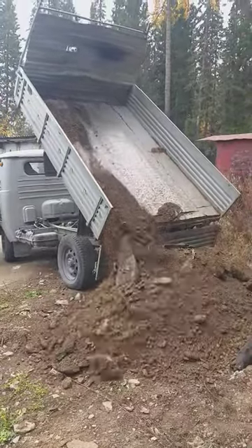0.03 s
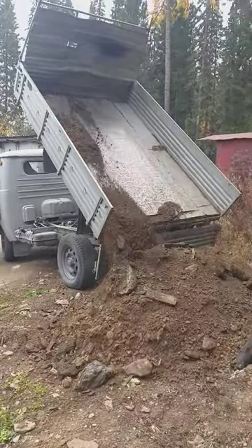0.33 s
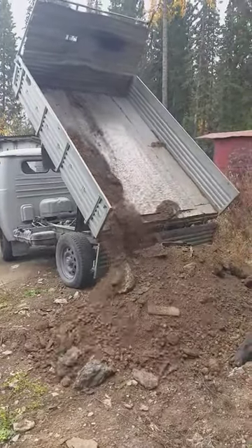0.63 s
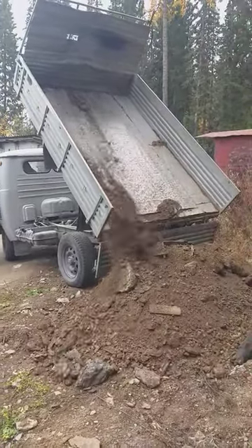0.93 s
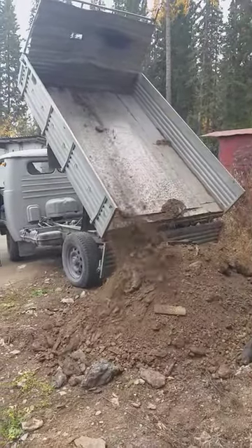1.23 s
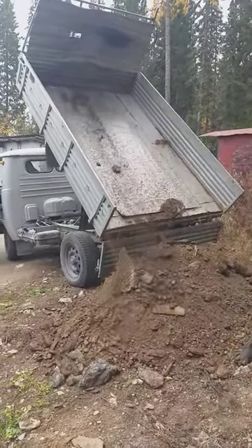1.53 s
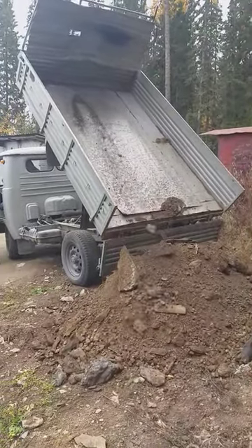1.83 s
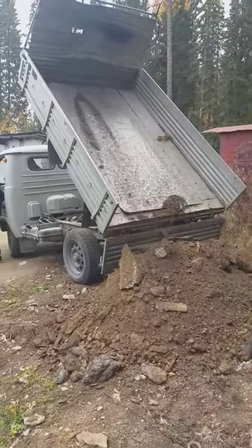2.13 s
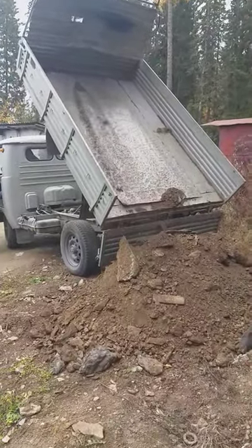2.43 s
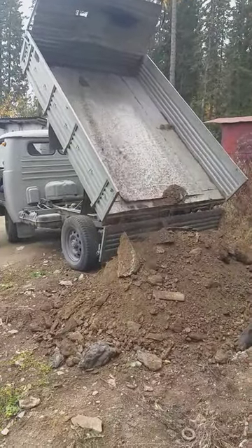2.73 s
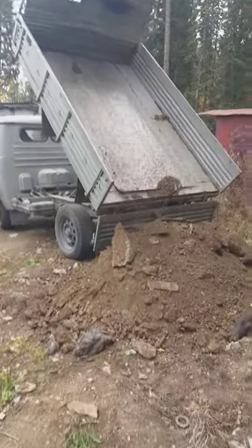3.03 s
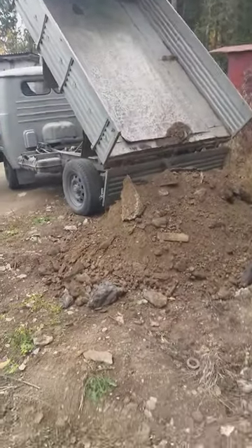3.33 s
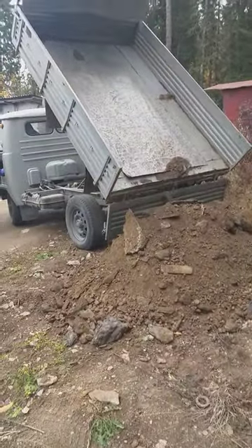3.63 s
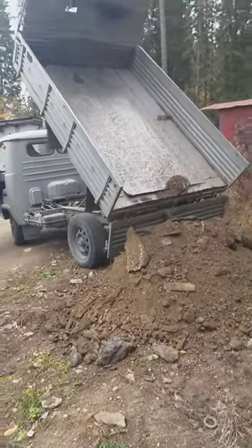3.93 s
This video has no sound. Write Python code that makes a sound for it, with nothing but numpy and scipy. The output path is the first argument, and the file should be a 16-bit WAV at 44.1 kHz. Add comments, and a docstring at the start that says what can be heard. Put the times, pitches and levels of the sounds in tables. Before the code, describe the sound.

Soil rushes down a tipper truck's steel bed for the first 1.4 seconds, with stones clacking, knocking and squealing in short gliding tones. Clods thud dully on the heap, most clearly near 1 second. From 1.5 seconds crumbs trickle and pebbles skip down the metal, thinning out after 3.2 seconds. A quiet engine drones throughout, and a faint thin whistle joins at about 3.5 seconds.

```python
"""Soil rushes down the raised steel bed of a small tipper truck, the last of its load, at a forest edge.
Stones in it clack and knock on the steel, and squeal in gliding tones as they stick and slip.
Clods thud on the heap, then crumbs trickle off the bed and thin out, leaving the engine's drone.
Near the end a thin whistle comes in, perhaps from the hydraulics."""
import sys
import numpy as np
from scipy import signal
from scipy.fft import rfft, irfft, next_fast_len
from scipy.io import wavfile
from scipy.ndimage import map_coordinates

SR = 44100
rng = np.random.default_rng(int(sys.argv[2]) if len(sys.argv) > 2 else 0)


def generate_wav(sig):
    """Save sig (samples, or channels by samples) to the path in sys.argv[1] as 16-bit PCM at SR."""
    pcm = np.round(np.clip(np.atleast_2d(sig).T, -1, 1) * 32767).astype(np.int16)
    wavfile.write(sys.argv[1], SR, pcm)


N = 176400

# tone colour of crumbs and pebbles on the bed, bright part and middle part (f/Hz, relative level/dB)
CRUMB_TREBLE = [(1700, -37), (2330, -14), (2650, 0), (3020, -5), (3450, 1), (3730, -6), (3990, 2.5),
                (4300, -0.5), (4580, 1), (5200, 1), (6150, -3), (7200, -.5), (8150, -.5), (10000, -19),
                (12800, -11), (15800, -13.5)]
CRUMB_MIDRANGE = [(260, -21.5), (450, -12.5), (600, -1), (760, -0.5), (930, -1), (1080, -15), (1310, -1.5),
                  (1670, -9), (2000, 3.5), (2350, -8.5), (3500, -33)]


def sliding_soil():
    """The mass of soil grinds over the bed: dense grit on top, ringing sheet steel below."""
    # loudness of the slide (t/s, grit level/dB, midrange level/dB)
    levels = [(0, -17.5, -25.5), (.07, -28.5, -29.5), (.125, -23, -28), (.17, -17, -28.5),
              (.28, -19.5, -25.5), (.5, -19, -27), (.7, -21, -25.5), (.78, -21, -23), (.84, -30.5, -30.5),
              (.91, -26, -39), (.96, -25, -32.5), (1.0, -20.5, -29.5), (1.13, -18.5, -30),
              (1.18, -22.5, -31), (1.31, -30.5, -31.5), (1.38, -32.5, -38.5), (1.44, -41, -51),
              (1.7, -83, -83)]
    # tone colours of the grit and of the bed's midrange (f/Hz, relative level/dB)
    grit_colour = [(1200, -31.5), (2400, -9), (3200, -6.5), (3600, -3), (4200, -4.5), (4600, -1.5),
                   (6400, -6), (8100, -5), (9000, -14.5), (10000, -29.5), (12000, -21), (15800, -36)]
    body_colour = [(200, -39.5), (480, -15.5), (620, 1.5), (800, 1.5), (1150, -1), (1700, 0), (2050, 1.5),
                   (2500, -8.5), (4000, -24.5)]
    grit_db, body_db = curves(levels)
    grit = unit(steel(shaped(grains(per_s=14000, spread_db=4.0), grit_colour), ring_db=5.0))
    body = unit(steel(shaped(grains(per_s=6000, spread_db=2), body_colour), ring_db=-0.5))
    return grit * amp(grit_db + 0.39 * wobble(42.3)) + body * amp(body_db + 1.15 * wobble(39.43))


def steel(x, ring_db):
    """The steel bed rings at its own pitches and adds them to the sound x."""
    # ringing pitches of the bed (f/Hz, width/Hz, relative level/dB)
    modes = [(767, 30, -4), (798, 40, -3), (1432, 15, 5.5), (1927, 28, 3.5), (2120, 59, 3.5),
             (2760, 240, -2.5), (3440, 20, -1), (3590, 50, 2.5), (3690, 37, -3), (4155, 92, 5.5),
             (4950, 45, 2.5), (5640, 240, -3.5), (6450, 77, -3), (6950, 44, -1), (7160, 65, -7.5),
             (7840, 150, -2)]
    def response(f):
        ring = sum(amp(db) * 1j * f * w / (hz * hz - f * f + 1j * f * w) for hz, w, db in modes)
        return (1 + amp(ring_db) * ring) / (1 + amp(ring_db) / 3)
    return filtered(x, response)


def clacking_stones():
    """Stones strike the steel: a ringing clack, with a sharp crack just after the first touch."""
    # strikes (t/s, clack level/dB, fade time/s, brightness/dB per octave, crack level/dB)
    strikes = [(0.0888, -8.5, 0.093, 2, -1), (0.4743, -7.5, 0.015, 8, -6), (0.684, -14.5, 0.25, 3.5, -4),
               (0.8896, -14, 0.035, 4.5, -5), (0.9123, -11, 0.1, -1, 2), (1.337, -18, 0.16, 4.5, 2.5)]
    # tone colours of the clack and the crack (f/Hz, relative level/dB)
    clack_colour = [(500, -35), (2800, -21), (3600, -9), (4200, 1.5), (5000, -4.5), (6000, -9), (7300, -4),
                    (8500, -14), (10000, -34.5), (12000, -23), (15800, -42)]
    crack_colour = [(2500, -31), (4300, 4), (5800, 1), (7400, 4), (10000, -17), (12200, -10), (15800, -17)]
    crack_lag_s = 0.00071
    clacks = sum(shaped(burst(s, db, t60, attack_s=0.00072), clack_colour, tilt_db)
                 for s, db, t60, tilt_db, _ in strikes)
    cracks = sum(tap(s + crack_lag_s, db) for s, *_, db in strikes)
    return steel(clacks, ring_db=-2) + shaped(cracks, crack_colour)


def knocking_stones():
    """Heavier stones hit the bed, scuff it and knock a short clank out of it."""
    # knocks (t/s, blow level/dB, scuff level/dB, scuff fade time/s)
    knocks = [(0.3888, -0.5, -14, 0.025), (0.7746, 7, -22, 0.071), (0.7760, 2, -22, 0.06),
              (0.7874, -5, -20, 0.045)]
    # tone colour of a knock (f/Hz, relative level/dB)
    knock_colour = [(100, -70), (500, -36), (950, -6.5), (1300, 6.5), (2000, 3), (2450, -4), (3300, -13),
                    (4200, -26), (5400, -13), (9000, -38), (15000, -51)]
    # tones of the clank (f/Hz, relative level/dB, fade time/s)
    clank_tones = [(1245, -27, .02), (1420, -28, .02), (1580, -32, .012), (1920, -26, .022),
                   (2100, -27, .012)]
    blows = sum(tap(s, db) for s, db, *_ in knocks)
    scuffs = sum(burst(s, db, t60, attack_s=0.001) for s, _, db, t60 in knocks)
    t = np.arange(SR // 8) / SR
    clank = sum(amp(db - 60 * t / t60) * np.cos(2 * np.pi * hz * t) for hz, db, t60 in clank_tones)
    return shaped(blows + scuffs, knock_colour) + signal.fftconvolve(blows, clank)[:N]


def scraping_stones():
    """Stones stick and slip on the steel at an unsteady rate, which makes a gliding squeal."""
    # one list per stone (t/s, slip rate/Hz, relative level/dB, unsteadiness/share of the rate)
    scrapes = [
        [(.135, 690, -22, 0.06), (.17, 847, -21.5, 0.04), (.22, 949, -30, 0.015), (.265, 1049, -21.5, 0.025),
         (.3, 1070, -39, .04)],
        [(.972, 690, -30, 0.048), (1.003, 836, -24.5, 0.025), (1.04, 917, -31.5, 0.025),
         (1.075, 999, -28, 0.018), (1.115, 1007, -22, 0.013), (1.14, 927, -26, 0.028), (1.2, 748, -42, .05)],
        [(1.06, 2100, -33, 0.036), (1.118, 1927, -28, 0.026), (1.142, 1820, -26.5, 0.04),
         (1.162, 1580, -29, .06), (1.185, 1390, -26.5, .06), (1.215, 1178, -28, .075), (1.255, 934, -28, 0.1)],
        [(1.22, 1610, -25, 0.12), (1.253, 1373, -28, 0.12), (1.275, 1186, -27, 0.11), (1.292, 1074, -40, .09),
         (1.312, 1018, -23.5, 0.025), (1.335, 970, -48, 0.062)],
    ]
    octave_db = -7.5
    t, out = np.arange(N) / SR, np.zeros(N)
    for rows in scrapes:
        hz, db, jitter = curves(rows)
        start, end = rows[0][0], rows[-1][0]
        fade = np.clip(np.minimum(t - start, end - t) / 0.004, 0, 1)
        turn = phase(hz * (1 + jitter * wobble(600)))
        squeal = np.sin(turn) + amp(octave_db) * np.sin(2 * turn)
        out += fade * amp(db - 1.0 + 2.4 * wobble(260)) * squeal
    return out


def singing_bed():
    """Now and then the rubbing makes the bed sing at one of its own pitches."""
    # sung tones (start/s, end/s, f/Hz, level/dB)
    tones = [(0.15, .26, 3590, -25.5), (0.3, 0.479, 1398, -28), (0.317, 0.478, 1880, -32.5),
             (0.46, 0.736, 1930, -28.5), (0.492, 0.549, 812, -27), (0.571, 0.699, 808, -24),
             (0.522, 0.725, 3740, -25), (0.938, 0.98, 1010, -29.5)]
    t, out = np.arange(N) / SR, np.zeros(N)
    for start, end, hz, db in tones:
        progress = np.clip((t - start) / (end - start), 0, 1)
        arch = (4 * progress * (1 - progress)) ** 0.23
        level = arch * amp(db + 1.5 * wobble(90.9))
        out += level * np.sin(phase(hz * (1 + 0.0092 * wobble(400))))
    return out


def trickling_crumbs():
    """Loose crumbs patter down in clumps over a midrange murmur of soil landing; at last single grains tick."""
    # loudness of the trickle (t/s, treble level/dB, midrange level/dB)
    levels = [(0, -31, -43), (1.3, -33, -38), (1.48, -35, -41), (1.56, -31, -39), (1.63, -35, -39.5),
              (1.79, -31.5, -38), (1.92, -34.5, -41.5), (2.07, -33, -39.5), (2.16, -31.5, -39),
              (2.41, -30, -37), (2.5, -32, -42), (2.6, -28.5, -37.5), (2.8, -33, -42), (3.02, -32.5, -42),
              (3.09, -35.5, -47), (3.16, -34, -49), (3.22, -41.5, -53.5), (3.45, -46.5, -59.5),
              (3.6, -53, -64), (4, -56, -69)]
    # single grains (t/s, level/dB)
    last_grains = [(3.066, -25), (3.592, -42), (3.636, -41), (3.8327, -36), (3.901, -42)]
    # tone colour of their ticks (f/Hz, relative level/dB)
    tick_colour = [(3000, -35), (6500, -14), (8000, 6), (9500, -13), (12500, -2), (15800, -16)]
    treble_db, body_db = curves(levels)
    clumps = clumping(per_s=110, t60=0.07, steady=0.48)
    patter = unit(grains(per_s=6000, spread_db=2) * clumps) * amp(treble_db)
    body = unit(grains(per_s=5000, spread_db=3.0) * clumps) * amp(body_db)
    ticks = sum(burst(s, db, t60=0.012, attack_s=.0003) for s, db in last_grains)
    return shaped(patter, CRUMB_TREBLE) + shaped(body, CRUMB_MIDRANGE) + shaped(ticks, tick_colour)


def skipping_pebbles():
    """Pebbles skip down the bed, each bounce a hard tap with a short rattle."""
    # bounces (t/s, relative level/dB, fade time/s)
    bounces = [(1.499, -28, 0.071), (1.542, -27, 0.06), (1.561, -31, 0.096), (1.6863, -33, 0.05),
               (1.7141, -19, 0.028), (1.723, -24, 0.13), (1.836, -39, 0.024), (1.882, -26.5, 0.046),
               (1.9384, -27.5, 0.035), (2.031, -23, 0.041), (2.0884, -21, 0.041), (2.101, -24.5, 0.041),
               (2.128, -27, 0.061), (2.2281, -24, 0.03), (2.258, -25, .05), (2.412, -25, 0.12),
               (2.5638, -22, 0.05), (2.641, -30, .025), (2.703, -32, 0.035), (2.854, -27, 0.15),
               (2.9378, -25, 0.072), (2.986, -27.5, 0.14), (3.007, -25, 0.046), (3.118, -30, 0.17),
               (3.157, -32, 0.052), (3.265, -38.5, 0.12), (3.33, -38, 0.12), (3.4946, -38.5, .09)]
    hits = sum(tap(s, db + 9.0) + burst(s, db, t60, attack_s=0.00028) for s, db, t60 in bounces)
    return shaped(hits, CRUMB_TREBLE, tilt_db=-1.2) + amp(-12.5) * shaped(hits, CRUMB_MIDRANGE)


def heap():
    """Soil and clods land on the heap with dull thuds."""
    # the stream of landing soil, and single heavy clods (t/s, level/dB)
    landing = [(0, -41), (.55, -40), (.95, -41.5), (1.15, -40), (1.55, -45), (1.78, -39.5), (2.05, -50),
               (2.42, -40), (2.6, -49), (3.1, -48.5), (3.4, -64), (4, -57.5)]
    clods = [(0.492, -26), (1.071, -20.5), (1.109, -29), (2.409, -35)]
    # tone colour of the earth (f/Hz, relative level/dB)
    earth_colour = [(30, -46), (90, -35.5), (160, -3.5), (250, 0.5), (400, -5.5), (650, 0), (1200, -8.5),
                    (4000, -73)]
    soil_db, = curves(landing)
    thuds = sum(burst(s, db, t60=0.11, attack_s=0.0026) for s, db in clods)
    soil = grains(per_s=760, spread_db=4.0) * amp(soil_db)
    return shaped(soil + thuds, earth_colour)


def engine():
    """The exhaust drones at multiples of the firing rate; rumble and clatter pulse at each firing."""
    # the main drone (t/s, f/Hz, level/dB)
    drone_path = [(0.0, 132.4, -50), (0.21, 138.0, -48), (0.93, 140.4, -45.5), (1.14, 132.8, -54),
                  (1.18, 129.8, -55.5), (1.63, 138, -63), (1.64, 137.7, -51), (2.05, 139.6, -46.5),
                  (3.0, 138.5, -41.5), (3.31, 137.2, -46), (3.65, 138, -42.5), (4.0, 138.5, -41.5)]
    # weaker exhaust tones (multiple of the firing rate, level at the end/dB)
    exhaust_tones = [(2, -68.5), (3, -61.5), (4, -62), (6, -63.5), (7, -61), (8, -62.5), (9, -69.5),
                     (11, -79)]
    # tone colours of the rumble and the clatter (f/Hz, relative level/dB)
    rumble_colour = [(20, -36), (45, -19), (100, -6), (200, 1), (300, 0), (400, -20), (900, -38)]
    clatter_colour = [(180, -41), (300, -18), (366, -13), (485, 2.5), (1040, -9), (1190, 3.5), (2270, 2),
                      (3160, -44), (5380, 5), (5840, -9), (6140, 6), (11700, -36), (15800, -54)]
    drone_multiple, firing_depth = 5, 0.2
    hz, db = curves(drone_path)
    turn = phase(hz / drone_multiple * (1 + 0.0035 * wobble(10)))
    drone = amp(db + 0.71 * wobble(24.14)) * unit(np.sin(drone_multiple * turn))
    tones = sum(amp(level + 1.1 * wobble(5.1)) * unit(np.sin(k * turn + 2 * np.pi * rng.random()))
                for k, level in exhaust_tones)
    firing = 1 + firing_depth * np.cos(turn)
    rumble = amp(-59.5) * unit(shaped(firing * rng.standard_normal(N), rumble_colour))
    clatter = amp(-56) * unit(shaped(firing * rng.standard_normal(N), clatter_colour))
    swell = amp(0.29 * (db - db[-1]))  # follows a share of the drone's rise and fall
    return drone + swell * (tones + rumble) + clatter


def whistle():
    """A thin wavering whistle creeps up in pitch; its octave grows as it swells."""
    # the whistle, perhaps of the hydraulics (t/s, level/dB, f/Hz)
    whistle_path = [(3.35, -89, 5620), (3.54, -58, 5628), (3.69, -59, 5637), (3.79, -49, 5650),
                    (3.86, -54, 5660), (4, -51, 5666)]
    db, hz = curves(whistle_path)
    turn = phase(hz * (1 + 0.0013 * wobble(60)))
    octave = amp(-17.5 + 1.4 * (db - db[-1])) * np.sin(2 * turn)
    return amp(db + 1.1 * wobble(32)) * (np.sin(turn) + octave)


def tap(s, db):
    """One hard contact at time s."""
    return amp(db) * (np.arange(N) == round(s * SR))


def burst(s, db, t60, attack_s):
    """A dying spray of contacts from time s; t60 is the fade time, the seconds to fall by 60 dB."""
    out, start = np.zeros(N + SR), round(s * SR)
    t = np.arange(SR // 4) / SR
    level = amp(db - 60 * t / t60) * (1 - np.exp(-t / attack_s))
    out[start:start + len(t)] = level * rng.standard_normal(len(t))
    return out[:N]


def grains(per_s, spread_db):
    """Tiny impacts at random times and of random size."""
    hit = rng.random(N) < per_s / SR
    size = np.clip(rng.standard_normal(N), -2, 2)
    sign = np.sign(rng.standard_normal(N))
    return unit(hit * sign * amp(spread_db * size))


def clumping(per_s, t60, steady):
    """Level of a stream that comes in little spills: each starts at once and dies away."""
    t = np.arange(SR // 8) / SR
    spills = (rng.random(N) < per_s / SR) * rng.random(N)
    power = steady + signal.fftconvolve(spills, amp(-60 * t / t60) ** 2)[:N]
    return unit(np.sqrt(np.abs(power)))


def shaped(x, points, tilt_db=0):
    """Give x a tone colour, made brighter by tilt_db per octave."""
    size = 2048
    hz = np.fft.rfftfreq(size, 1 / SR) + 1
    f, db = np.transpose(points)
    gain = amp(np.interp(np.log(hz), np.log(f), db) + tilt_db * np.log2(hz))
    # fold the filter so that it rings only after a hit, never before it
    cepstrum = irfft(np.log(gain))
    cepstrum[1:size // 2] *= 2
    cepstrum[size // 2 + 1:] = 0
    ring = irfft(np.exp(rfft(cepstrum)))
    return signal.fftconvolve(x, ring / np.linalg.norm(ring))[:N]


def filtered(x, response):
    """Multiply each frequency in x by response(frequency)."""
    size = 2 * next_fast_len(N // 2 + 8192)
    return irfft(rfft(x, size) * response(np.fft.rfftfreq(size, 1 / SR)), size)[..., :N]


def curves(rows):
    """One value per sample for each column after the time."""
    s, *cols = np.transpose(rows)
    return [np.interp(np.arange(N) / SR, s, c) for c in cols]


def wobble(rate):
    """A smooth curve through random values, rate of them a second."""
    return map_coordinates(rng.standard_normal(N // 8), [np.arange(N) * rate / SR], mode="wrap")


def phase(hz):
    """Running angle of a tone whose pitch follows hz."""
    return 2 * np.pi * np.cumsum(hz) / SR


def amp(db):
    """Decibels to gain."""
    return 10 ** (np.asarray(db) / 20)


def unit(x):
    """Scale to an average power of 1."""
    return x / np.sqrt(np.mean(x ** 2) + 1e-20)


def scene():
    """All sources lie straight ahead in the open air; the midrange leans slightly left."""
    # lean to the left (f/Hz, share added on the left and taken from the right)
    left_shares = [(900, 0.0013), (1200, 0.0039), (1600, 0.15), (1950, 0.12), (2600, 0.0074),
                   (6500, 0.0017), (8000, 0.015), (11000, 0.0022)]
    sound = sliding_soil() + scraping_stones() + singing_bed() + trickling_crumbs()
    sound += clacking_stones() + knocking_stones() + skipping_pebbles()
    sound += heap() + engine() + whistle()
    lean = filtered(sound, lambda hz: np.interp(hz, *np.transpose(left_shares)))
    return np.array([sound + lean, sound - lean])


def record(dry):
    """Round off the highest peaks and cut away the very top of the treble."""
    ceiling, knee, top_hz = .93, 8, 15950
    rounded = dry / (1 + np.abs(dry / ceiling) ** knee) ** (1 / knee)
    return filtered(rounded, lambda hz: hz < top_hz)


dry = scene()
out = record(dry)
generate_wav(out)
```